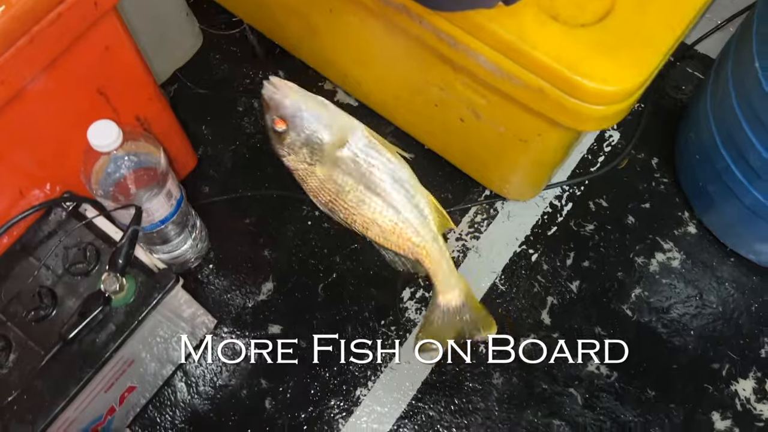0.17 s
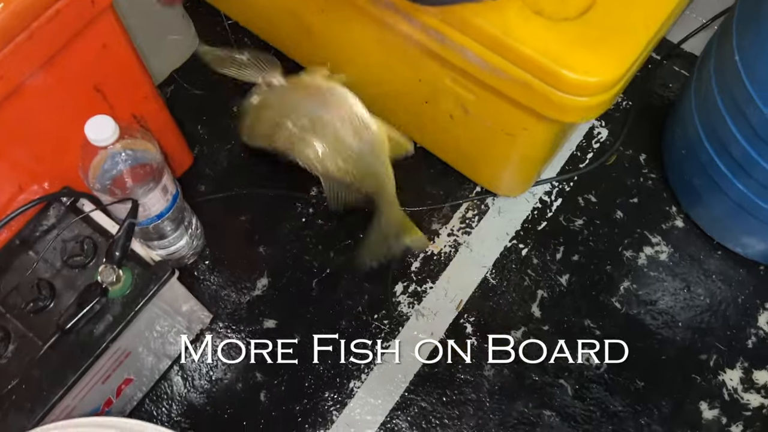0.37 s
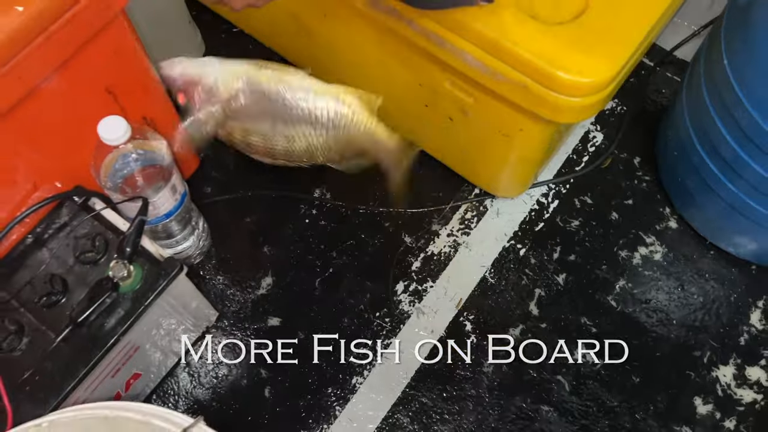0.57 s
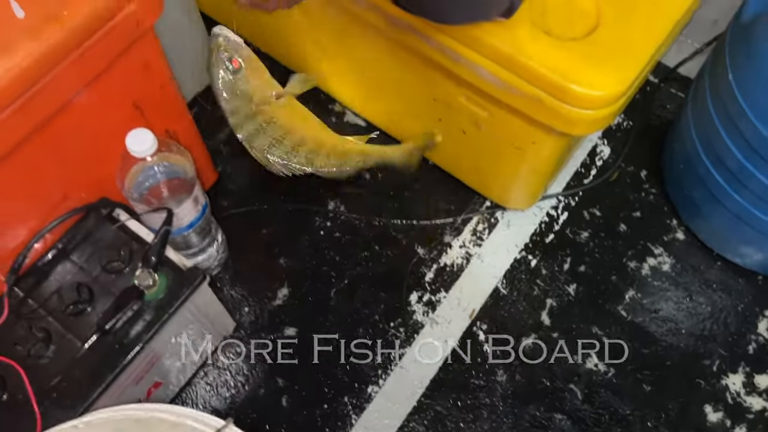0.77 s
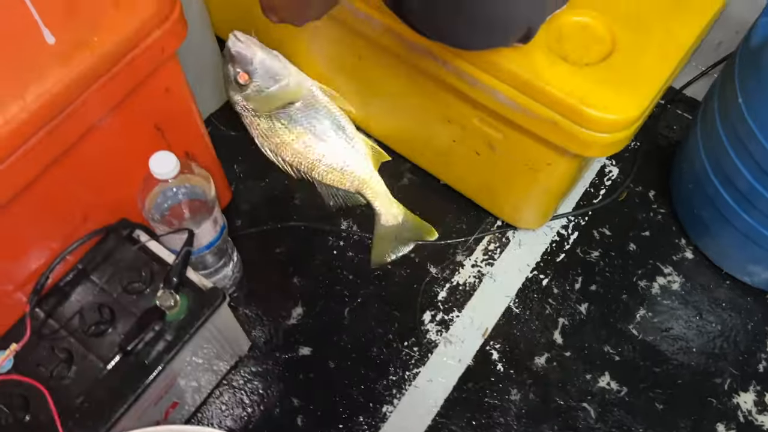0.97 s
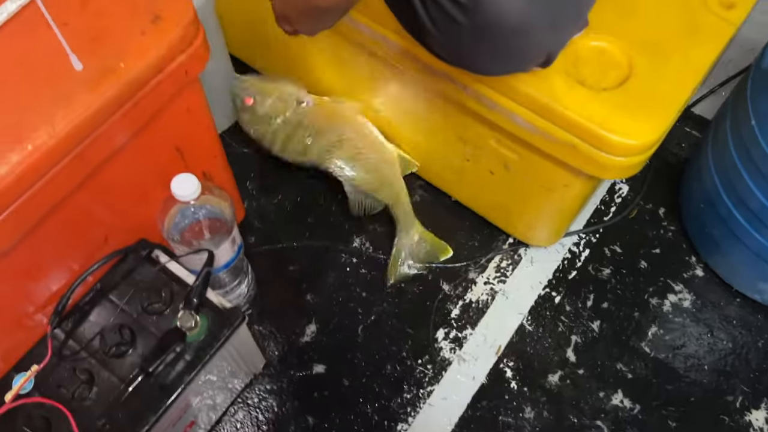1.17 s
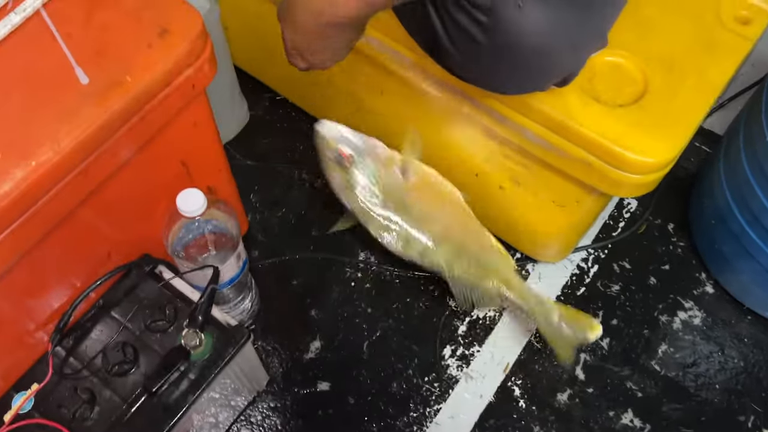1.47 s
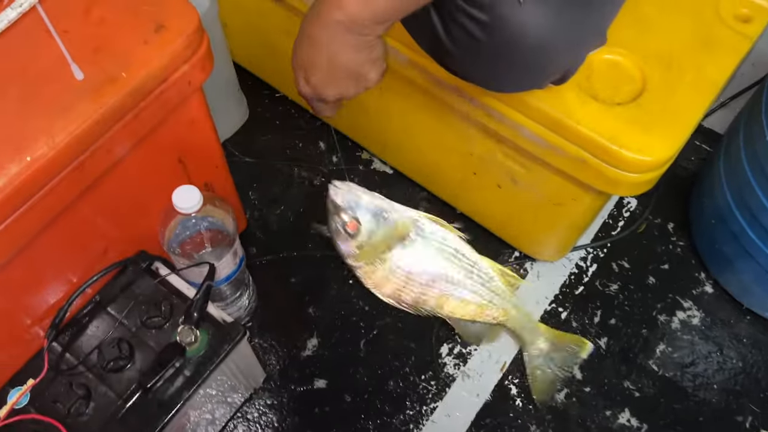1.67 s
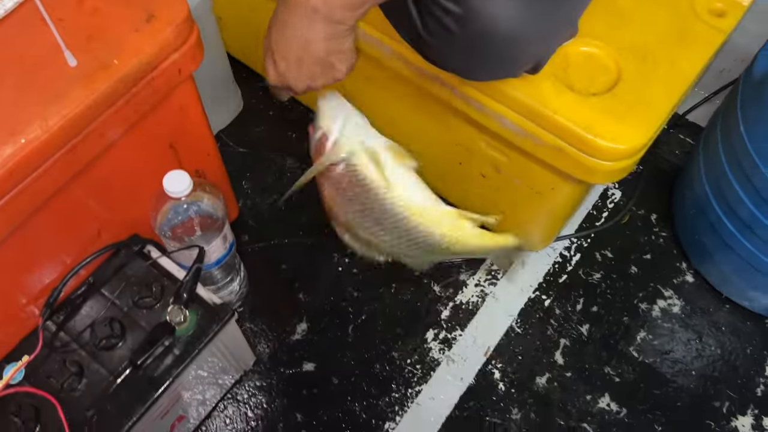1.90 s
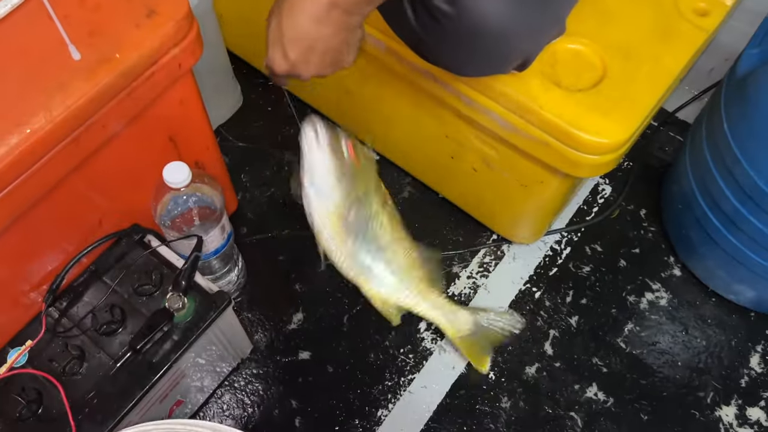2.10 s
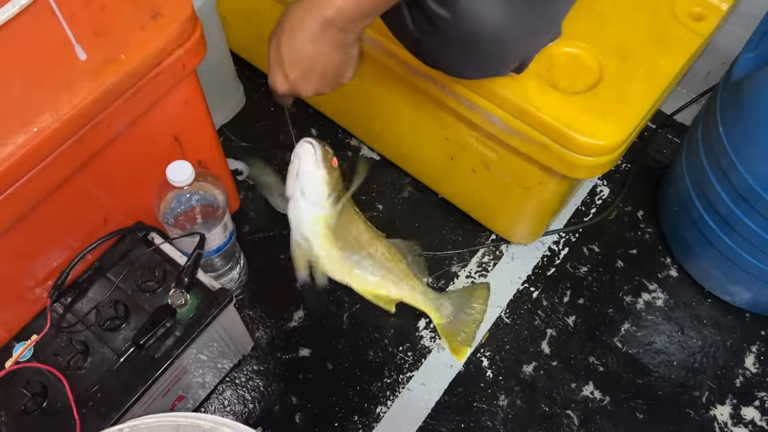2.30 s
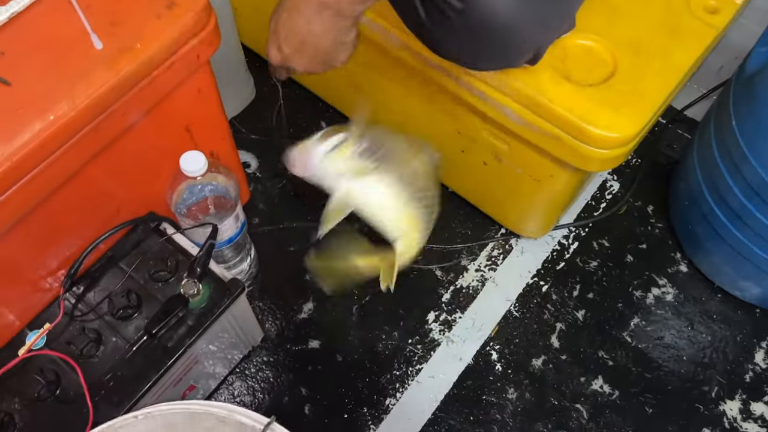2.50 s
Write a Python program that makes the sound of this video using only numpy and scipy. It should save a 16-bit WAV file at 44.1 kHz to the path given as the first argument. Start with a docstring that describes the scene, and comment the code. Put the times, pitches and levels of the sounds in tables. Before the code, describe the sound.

A caught fish flaps on a wet, hollow boat deck: a loose series of soft thuds and wet slaps, then two much harder blows, with faint slithers and ticks between, close stereo microphone, short echoes, low rumble.

```python
"""On the wet deck of a small boat, between plastic boxes, a freshly caught fish thrashes.
Each blow joins a wet slap of skin (shaped noise) to a thud of the body (a sinking sine) that sets
the modes of the hollow deck and hull ringing. Between blows the fish slithers (grainy noise and bubbles)
and squelches (runs of pops); tackle ticks, a hook tinkles and rubbed plastic squeaks (a wobbling tone).
The boxes and gunwales return short echoes, and the hull rumbles faintly underneath (coloured noise)."""
import sys
import numpy as np
from scipy import signal
from scipy.fft import rfft, irfft
from scipy.io import wavfile

SR = 44100
rng = np.random.default_rng(int(sys.argv[2]) if len(sys.argv) > 2 else 0)


def file_out(sig):
    """Save sig as 16-bit WAV at sys.argv[1]."""
    # one column per channel
    cols = np.atleast_2d(sig).T
    # limit, then scale
    lim = np.clip(cols, -1, 1)
    pcm = np.round(lim * 32767).astype(np.int16)
    wavfile.write(sys.argv[1], SR, pcm)


N = 116865
TIME = np.arange(N) / SR  # s
FREQS = np.fft.rfftfreq(N, 1 / SR) + 1e-3  # Hz, kept above zero for logarithms


def from_db(db):
    """Level law: decibels to amplitude gain."""
    return 10 ** (np.asarray(db) / 20)


def at_hz(points, hz, axis=1):
    """Logarithmic frequency scale: reads a column of a table between its rows."""
    table = np.array(points)
    return np.interp(np.log(hz), np.log(table[:, 0]), table[:, axis])


# Likeness of the two channels. Each row: frequency in Hz, left-right correlation (-1 to 1).
LIKENESS = [(60, 0.99), (300, 0.9), (700, 0.58), (1500, 0.53), (3000, -0.46), (5000, 0.33), (13000, -0.033)]


def stereo_noise(db):
    """Interchannel coherence: coloured noise, alike in the bass and more diffuse above; rms 1."""
    mid, side = rfft(rng.standard_normal((2, N)))
    alike = np.clip(at_hz(LIKENESS, FREQS), -.99, .995)
    common = np.sqrt(1 + alike) * mid
    opposed = np.sqrt(1 - alike) * side * [[1], [-1]]
    noise = irfft(from_db(db) * (common + opposed), N)
    return noise / noise.std()


def pitched_noise(hz, octaves):
    """Band-limited noise: the spectrum falls away on both sides of one pitch."""
    distance = np.log2(FREQS / hz) / octaves
    return stereo_noise(-20 * np.log10(1 + distance ** 2))


def random_steps(steps, rate_hz):
    """Linear interpolation: joins random values that follow one another at a given rate."""
    return np.interp(TIME * rate_hz, np.arange(N), steps)


GRAIN_RATE_HZ = 700


def grain(depth_db):
    """Amplitude modulation: fast uneven gain, as scales catch and water films burst; rms 1."""
    gain = from_db(depth_db * random_steps(rng.standard_normal(N), GRAIN_RATE_HZ))
    return gain / np.sqrt(np.mean(gain ** 2))


def swell(s, rise_s, fall_s):
    """Exponential growth and decay: a rise to a peak of 1 at s, then a fall."""
    exponent = np.maximum((s - TIME) / rise_s, (TIME - s) / fall_s)
    return np.exp(-np.minimum(exponent, 40))


def burst(s, fall_s):
    """Impulsive onset: a sudden start, a brief hold, then an exponential fall."""
    age = np.clip((TIME - s) / fall_s, 0, 40)
    return (TIME >= s) * (1 + 2 * age) * np.exp(-2 * age)


def ring(clicks, hz, t60):
    """Damped resonance: each click rings at hz and falls 60 dB in t60 seconds."""
    r, w = from_db(-60 / (t60 * SR)), 2 * np.pi * hz / SR
    return signal.lfilter([0, np.sin(w)], [1, -2 * r * np.cos(w), r * r], clicks)


def strike(blows, modes):
    """Modal superposition: blows of (s, dB) excite all modes (Hz, dB, t60 s) of one body."""
    clicks, out = np.full(N, 1e-18), 0  # tiny offset keeps the filters fast
    for s, db in blows:
        clicks[max(int(s * SR), 0)] += from_db(db)
    for k, (hz, db, t60) in enumerate(modes):
        out = out + (-1) ** k * from_db(db) * ring(clicks, hz, t60)  # neighbours in opposite phase
    return out


# Colour of the rumble. Each row: frequency in Hz, relative level in dB per Hz.
RUMBLE_COLOUR = [(20, -62), (45, -5.5), (72, 1.5), (115, -9.5), (220, -24), (400, -22), (1000, -33.5),
                 (3000, -36.5), (7000, -43), (16000, -47)]
RUMBLE_DB = -43.5


def hull_rumble():
    """Stationary random vibration: steady, mostly low noise of the hull."""
    return from_db(RUMBLE_DB) * stereo_noise(at_hz(RUMBLE_COLOUR, FREQS))


# A faint squeak of rubbed plastic. Its one row: start in seconds, length in seconds, level in dB, pitch in Hz.
SQUEAK = (2.565, .095, -52, 1420)
SQUEAK_WOBBLE, SQUEAK_WOBBLE_HZ, SQUEAK_EDGE_S = 0.0128, 243.5, 0.069  # wobble: share of the pitch


def squeak():
    """Stick-slip friction: a thin tone that wobbles in pitch and breaks up."""
    s, length, db, hz = SQUEAK
    wobble, grip = (random_steps(steps, SQUEAK_WOBBLE_HZ) for steps in rng.standard_normal((2, N)))
    edges = np.clip(np.minimum(TIME - s, s + length - TIME) / SQUEAK_EDGE_S, 0, 1)
    gate = edges * np.maximum(1 + grip, 0)
    cycles = np.cumsum(hz * (1 + SQUEAK_WOBBLE * wobble)) / SR
    return from_db(db) * gate * np.sin(2 * np.pi * cycles)


# Touches on a hook. Each row: start in seconds, level in dB.
TINKLES = [(2.337, -47.5), (2.595, -56.5)]
# Modes of the hook. Each row: frequency in Hz, level in dB, 60 dB decay time in seconds.
HOOK = [(3052, 0, 0.36), (8632, -6, 0.26)]


def hook():
    """Modal ringing: light touches set the hook tinkling."""
    return strike(TINKLES, HOOK)


# Ticks and knocks of fins, drops, boxes and tackle.
# Each row: start in seconds, level in dB, centre in Hz, width in octaves, die-away in seconds.
TICKS = [(0.173, -39, 12200, 1, 0.011), (0.175, -34.5, 3240, 0.28, 0.0067),
         (0.649, -22.5, 884, 0.31, 0.0092), (0.995, -39.5, 10400, 0.97, 0.005),
         (0.999, -38.5, 1870, 0.46, 0.0067), (1.121, -43.5, 10000, 1, 0.0039),
         (1.526, -16, 1197, .06, 0.0085), (1.733, -39, 800, 0.5, 0.0023), (2.03, -44, 8050, 0.67, 0.009),
         (2.468, -33.5, 12300, 0.56, 0.015), (2.489, -32, 660, 0.48, 0.0098), (2.518, -40, 400, 1, 0.0051),
         (2.561, -38, 1370, 0.13, 0.0049), (2.606, -46, 9700, 0.47, 0.015),
         (2.640, -35.5, 1420, 0.14, 0.0039)]
TICK_ATTACK = 0.13  # share of a tick's die-away time


def ticks():
    """Light impact: each contact is a short noise burst around its own pitch."""
    out = 0
    for s, db, hz, width, fall in TICKS:
        attack = np.clip((TIME - s) / (TICK_ATTACK * fall), 0, 1)
        out = out + from_db(db) * attack * burst(s, fall) * pitched_noise(hz, width)
    return out


# Wet skin peels off the deck in runs of pops.
# Each row: start in seconds, length in seconds, level in dB, centre in Hz.
SQUELCHES = [(0.284, 0.041, -40, 1070), (0.349, 0.024, -48.5, 1560), (.624, 0.004, -36.5, 1160),
             (0.717, 0.033, -49.5, 1780), (1.118, 0.064, -47.5, 1950)]
SQUELCH_POPS_PER_S, SQUELCH_SPREAD_OCT, SQUELCH_SPREAD_DB = 200, .45, 6
SQUELCH_CYCLES = 20  # cycles of a pop until it is 60 dB down


def squelches():
    """Cavity resonance: air pockets pop in uneven runs, each with its own pitch, size and side."""
    out = np.zeros((2, N))
    for s, length, db, hz in SQUELCHES:
        count = max(round(length * SQUELCH_POPS_PER_S), 1)
        run = np.zeros((2, N))
        for k, (late, pitch, size, side) in enumerate(rng.uniform(-1, 1, size=(64, 4))[:count]):
            pop_s = s + (k + late / 2) / SQUELCH_POPS_PER_S
            pop_hz = hz * 2 ** (SQUELCH_SPREAD_OCT * pitch)
            pop = strike([(pop_s, SQUELCH_SPREAD_DB * size)], [(pop_hz, 0, SQUELCH_CYCLES / pop_hz)])
            run += np.outer([1 + side / 2, 1 - side / 2], pop)
        # rms 1 over the nominal length of the run
        out += from_db(db) * run * np.sqrt(2 * length * SR / np.sum(run ** 2))
    return out


BUBBLES_PER_S, BUBBLE_SPREAD_DB = 320, 8
BUBBLE_DB = -7  # relative to the rub
BUBBLE_CYCLES = 5.1  # cycles until a bubble is 60 dB down
BUBBLE_LOW_HZ, BUBBLE_HIGH_HZ = 920, 4720


def bubbles(level):
    """Bubble resonance: bursts in the water film ring briefly, as strongly as the fish rubs."""
    born = rng.random(N) < BUBBLES_PER_S / SR
    size_db = BUBBLE_SPREAD_DB * np.minimum(rng.exponential(1, N), 2.5)
    sizes = born * from_db(size_db) * rng.choice([-1, 1], N)
    pitches = np.geomspace(BUBBLE_LOW_HZ, BUBBLE_HIGH_HZ, 20)
    dealt = rng.integers(0, 20, N)  # which pitch each bubble gets
    sides = rng.uniform(0, np.pi / 2, N)  # pan angle
    clicks = sizes * level * np.array([np.cos(sides), np.sin(sides)])
    out = 0
    for k, hz in enumerate(pitches):
        out = out + ring(clicks * (dealt == k) + 1e-18, hz, BUBBLE_CYCLES / hz)
    return from_db(BUBBLE_DB) * out * np.sqrt(np.mean(level ** 2) / np.mean(out ** 2))


# The fish slithers. Each row: peak in seconds, rise in seconds, fall in seconds, rub in dB, hiss in dB.
SLIDES = [(0.058, 0.064, 0.034, -39, -47.5), (.215, 0.026, 0.12, -50, -52.5),
          (0.31, 0.02, 0.016, -50, -43.5), (0.488, 0.016, 0.036, -55, -50.5),
          (.60, 0.026, 0.034, -44.5, -46.5), (.95, 0.13, 0.02, -49.5, -57), (1.173, 0.031, 0.011, -42, -43),
          (1.228, 0.014, 0.025, -42.5, -49), (1.311, 0.016, 0.015, -44, -49),
          (1.438, 0.0045, 0.03, -31.5, -42), (1.471, 0.011, 0.022, -45, -55.5),
          (1.808, 0.05, 0.044, -42, -40), (2.06, 0.06, 0.034, -51, -56), (2.355, 0.054, 0.021, -45, -47.5),
          (2.485, 0.033, 0.027, -42.5, -40)]
# Colours of the rub and the hiss. Each row: frequency in Hz, relative level in dB per Hz.
RUB_COLOUR = [(100, 8.5), (300, 0), (700, -6.5), (1400, -14), (2200, -11.5), (3500, -15.5), (8000, -23.5)]
HISS_COLOUR = [(600, -32), (2200, -1), (4500, -1.5), (7000, 0), (9000, -1), (12500, 1), (16000, -7)]
SLIDE_GRAIN_DB = 3


def slides():
    """Sliding friction: scales on the wet deck give a dull rub, a grainy hiss and crackling bubbles."""
    rub = sum(from_db(db) * swell(s, rise, fall) for s, rise, fall, db, _ in SLIDES)
    hiss = sum(from_db(db) * swell(s, rise, fall) for s, rise, fall, _, db in SLIDES)
    friction = rub * stereo_noise(at_hz(RUB_COLOUR, FREQS)) + hiss * stereo_noise(at_hz(HISS_COLOUR, FREQS))
    return grain(SLIDE_GRAIN_DB) * friction + bubbles(rub)


# Wet skin hits the deck. Each row: start in seconds, die-away in seconds, smack in dB, spray in dB.
SLAPS = [(0.288, 0.023, -36.5, -45.5), (0.317, 0.011, -34, -48), (.356, 0.024, -39.5, -51.5),
         (0.625, 0.014, -39, -55), (.645, 0.014, -26.5, -29), (0.653, 0.015, -25, -27),
         (0.718, 0.035, -41.5, -45), (0.869, 0.0024, -27, -38), (0.875, 0.0074, -27.5, -20),
         (1.524, 0.0066, -9, -14.5), (2.1417, 0.0033, -13.5, -14.5)]
# Colours of the smack and the spray. Each row: frequency in Hz, relative level in dB per Hz.
SMACK_COLOUR = [(100, -57), (300, 8), (600, 2.5), (1150, -5.5), (1600, -12), (2300, -11), (3500, -16),
                (8000, -42)]
SPRAY_COLOUR = [(500, 6), (2000, 8.7), (3500, 6), (5500, 7.4), (8000, 6.3), (9500, 1.2), (11500, 7.9),
                (15500, 6.8)]
SLAP_GRAIN_DB = 0  # 0 leaves the slaps smooth
LEAD_DB, LEAD_RISE_S = -16, .0035  # a soft, quick swell of noise just before each slap


def slaps():
    """Wet impact: trapped air gives a smack, squeezed-out water a bright spray."""
    smack = spray = 0
    for s, fall, smack_db, spray_db in SLAPS:
        shape = burst(s, fall) + from_db(LEAD_DB) * swell(s, LEAD_RISE_S, fall)
        smack = smack + from_db(smack_db) * shape
        spray = spray + from_db(spray_db) * shape
    smack_noise = smack * stereo_noise(at_hz(SMACK_COLOUR, FREQS))
    spray_noise = spray * stereo_noise(at_hz(SPRAY_COLOUR, FREQS))
    return grain(SLAP_GRAIN_DB) * (smack_noise + spray_noise)


# The body lands. Each row: start in seconds, deck ring in dB, hull boom in dB,
# settled thud pitch in Hz, thud level in dB, 60 dB decay time of the thud in seconds.
THUMPS = [(.001, -36, -32, 86.5, -17.5, 0.11), (0.076, -39.5, -55, 100, -24.5, 0.17),
          (.18, -32, -37, 188.4, -26.5, 0.14), (0.217, -50, -41.5, 72, -16.5, 0.083),
          (0.289, -38, -34, 200, -13.5, 0.026), (0.299, -23.5, -39.5, 155.3, -5.5, 0.073),
          (0.339, -53, -42, 155, -18.5, 0.088), (.623, -26, -42, 205, -17.5, 0.44),
          (0.653, -24, -38, 77, -13, 0.24), (0.658, -33, -25, 175.4, -7, 0.086),
          (0.714, -32, -40, 210, -33, 0.098), (0.8761, -29, -40, 184.8, -4.5, 0.048),
          (1.002, -48, -62, 205, -24, 0.054), (1.064, -39.5, -58, 219, -35, 0.14),
          (1.181, -39, -62, 234, -28.5, 0.051), (1.312, -42.5, -45, 173.5, -28.5, 0.065),
          (1.5283, -20.5, -17.5, 138.6, -1, 0.053), (1.545, -19.5, -43, 104, -6.5, 0.11),
          (1.821, -37.5, -35.5, 72, -17, 0.13), (2.1436, -15.5, -14.5, 103.5, 3, 0.079)]
# Modes of the hollow deck and of the hull under it.
# Each row: frequency in Hz, level in dB, 60 dB decay time in seconds.
DECK = [(142, -1.5, 0.11), (205, 4.5, 0.14), (251.9, -6.5, 0.2), (344.4, -2.5, 0.16), (415, -6.5, 0.12),
        (454.6, -10.5, 0.094), (578, -16.5, 0.133), (707, -14.5, 0.05), (800, -15.5, 0.11),
        (930, -20, 0.075), (1167, -15, 0.053)]
HULL = [(72, -2.5, 0.2), (110.6, 2, 0.51), (129.2, -0.5, 0.23)]
THUD_ATTACK_S, THUD_SETTLE_S = 0.0027, 0.00409
THUD_GLIDE_HZ = 324  # a 0 dB thud starts this much higher, others in proportion to amplitude


def thumps():
    """Impact excitation: a thud sinks in pitch as the flesh spreads; deck and hull ring on."""
    blows = np.array(THUMPS)
    out = strike(blows[:, [0, 1]], DECK) + strike(blows[:, [0, 2]], HULL)
    for s, _, _, hz, db, t60 in THUMPS:
        age = np.clip(TIME - s, 0, 2 * t60)
        glide_hz = THUD_GLIDE_HZ * from_db(db)
        cycles = hz * age + glide_hz * THUD_SETTLE_S * (1 - np.exp(-age / THUD_SETTLE_S))
        attack = 1 - np.exp(-age / THUD_ATTACK_S)
        out += from_db(db - 60 * age / t60) * attack * np.sin(2 * np.pi * cycles)
    return out


# Reflections from boxes and gunwales. Each row: frequency in Hz, level in dB, 60 dB decay time in seconds.
ECHOES = [(100, -9, 0.54), (282, -5, 0.2), (800, -4.5, 0.17), (2000, -1.5, 0.13), (4840, -0.5, 0.16),
          (13100, -7.5, 0.17)]
ECHO_BUILD_S = 0.00033


def reflections(x):
    """Reverberation: dense short echoes from the surrounding boxes, dying band by band."""
    edges, length = np.geomspace(40, 18000, 13), SR // 2  # Hz, samples
    white = stereo_noise(np.zeros(len(FREQS)))[:, :length]
    spectrum, freqs = rfft(white), np.fft.rfftfreq(length, 1 / SR)
    age, response = TIME[:length], 0
    for low, high in zip(edges, edges[1:]):
        hz = np.sqrt(low * high)
        decay = from_db(-60 * age / at_hz(ECHOES, hz, axis=2))
        tail = decay * (1 - np.exp(-age / ECHO_BUILD_S))
        band = irfft(spectrum * ((freqs >= low) & (freqs < high)), length)
        response = response + from_db(at_hz(ECHOES, hz)) * band * tail / np.linalg.norm(tail)
    return signal.fftconvolve(x, response, axes=1)[:, :N]


def scene():
    """Superposition: the fish, tackle and plastic with their reflections over the hull rumble."""
    sources = squeak() + hook() + ticks() + squelches() + slides() + slaps() + thumps()
    return hull_rumble() + sources + reflections(sources)


# Colour of the two microphones. Each row: frequency in Hz, left minus right in dB.
BALANCE = [(300, 0.6), (800, 2.2), (1300, 2), (2100, -3.5), (3300, -1.7), (5300, 5), (9000, -0.7),
           (15000, 0.5)]
NOTCH_HZ, NOTCH_WIDTH_HZ, NOTCH_DB = 10135, 833, -17.5  # width: from the centre to 1/e of the dB depth
CUTOFF_HZ = 15900


def record(dry):
    """Transducer response: two microphones of unlike colour, rounded peaks, a shared notch, a cut top."""
    colour_db = at_hz(BALANCE, FREQS) * np.array([[.5], [-.5]])
    x = irfft(rfft(dry) * from_db(colour_db), N)
    x = x / (1 + (x / .95) ** 6) ** (1 / 6)  # rounds peaks towards .95
    notch_db = NOTCH_DB * np.exp(-((FREQS - NOTCH_HZ) / NOTCH_WIDTH_HZ) ** 4)
    x = irfft(rfft(x) * from_db(notch_db), N)
    low_pass = signal.ellip(10, .2, 80, CUTOFF_HZ, fs=SR, output="sos")
    return signal.sosfilt(low_pass, x)


dry = scene()
out = record(dry)
file_out(out)
```